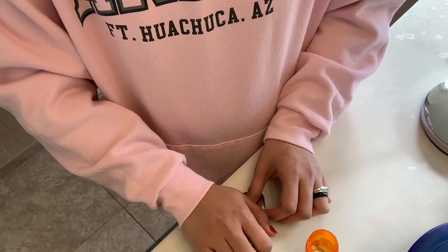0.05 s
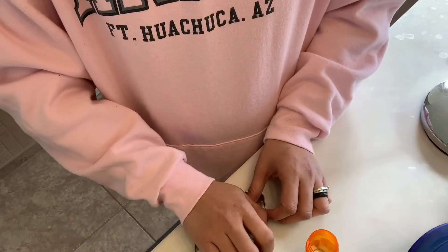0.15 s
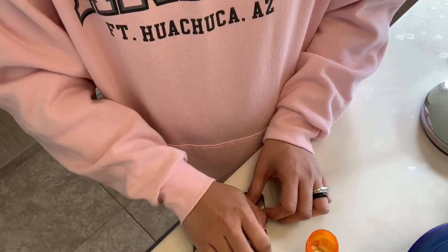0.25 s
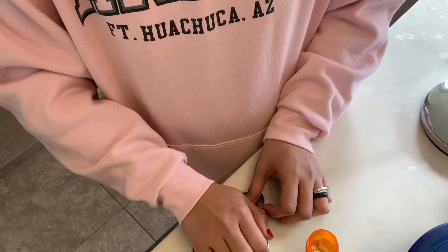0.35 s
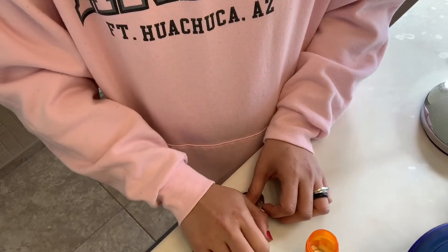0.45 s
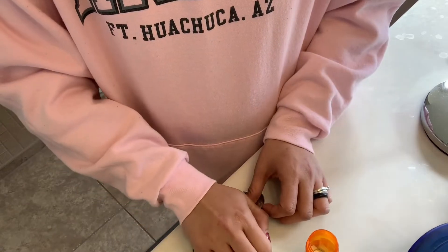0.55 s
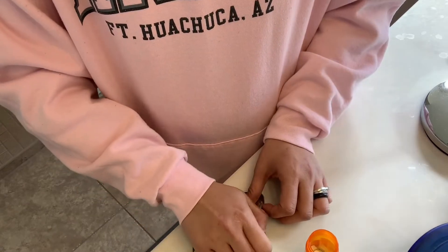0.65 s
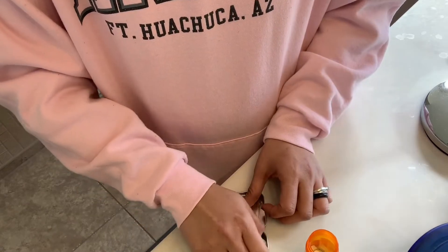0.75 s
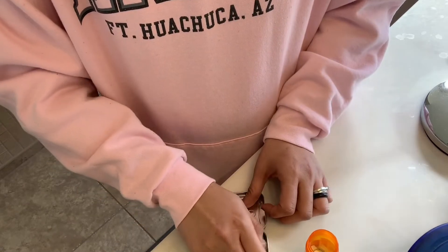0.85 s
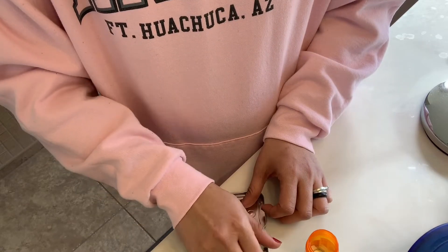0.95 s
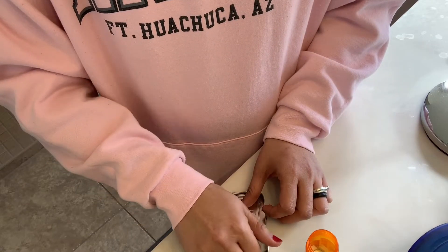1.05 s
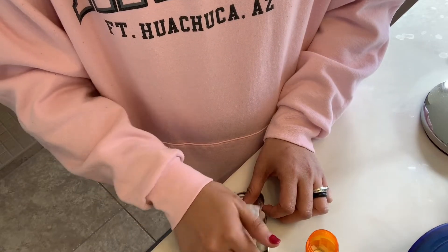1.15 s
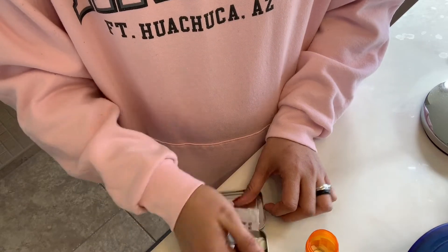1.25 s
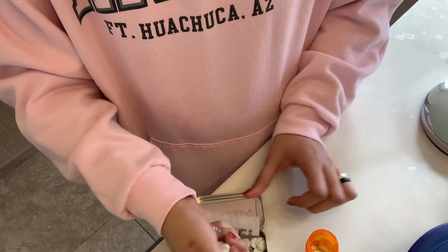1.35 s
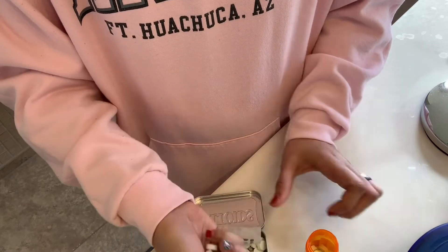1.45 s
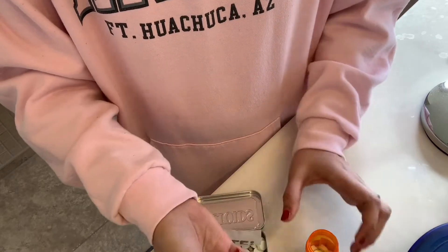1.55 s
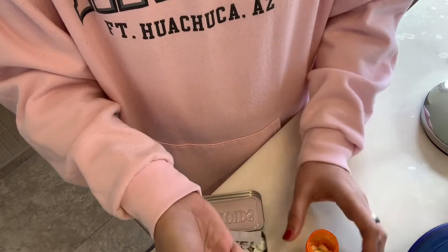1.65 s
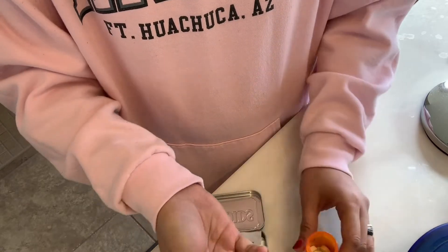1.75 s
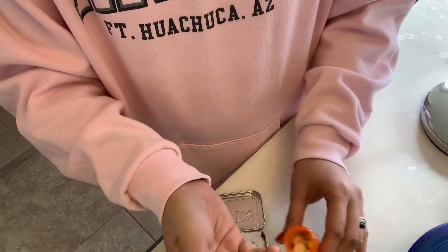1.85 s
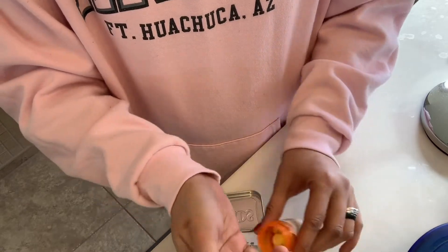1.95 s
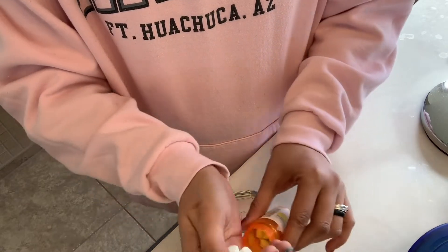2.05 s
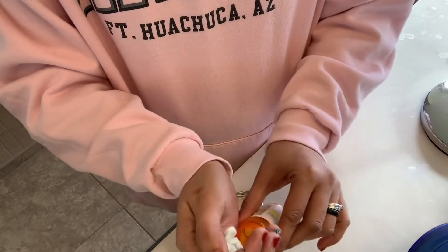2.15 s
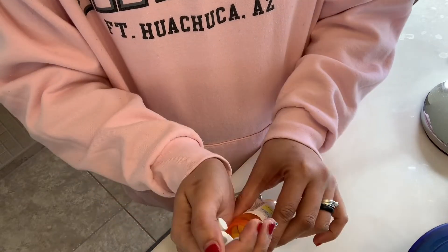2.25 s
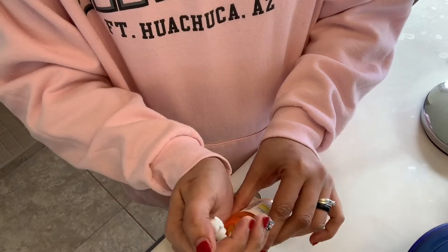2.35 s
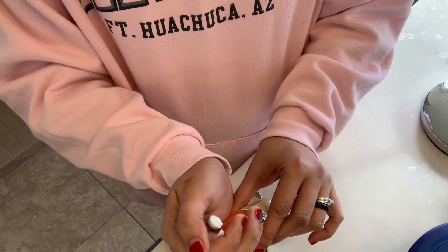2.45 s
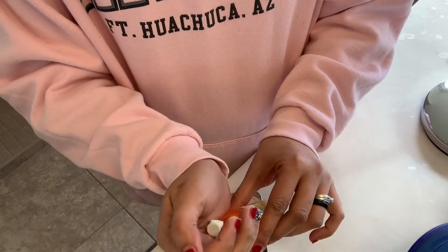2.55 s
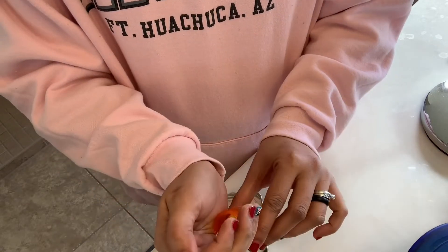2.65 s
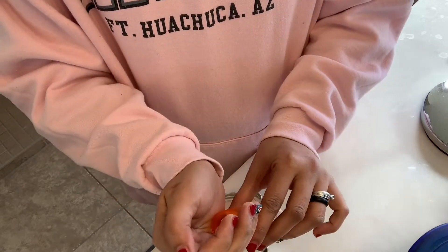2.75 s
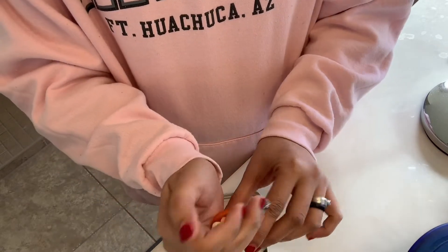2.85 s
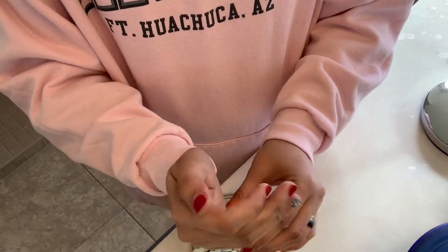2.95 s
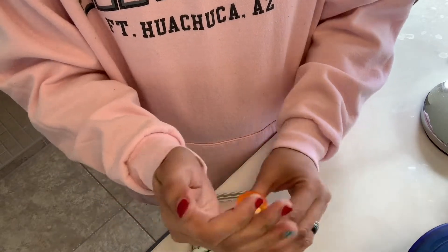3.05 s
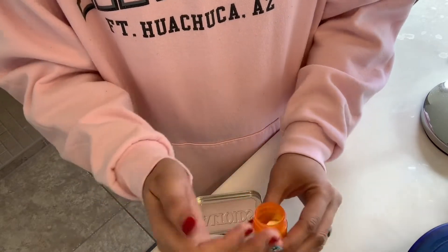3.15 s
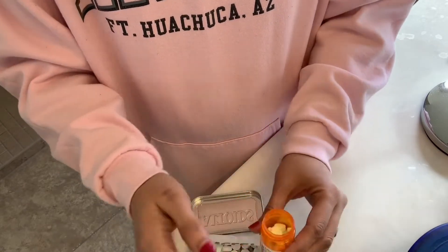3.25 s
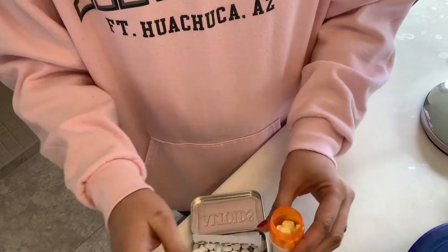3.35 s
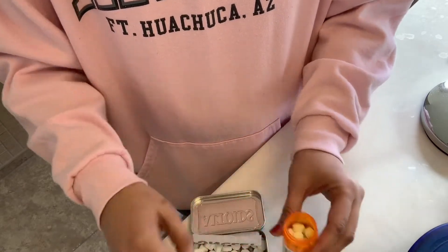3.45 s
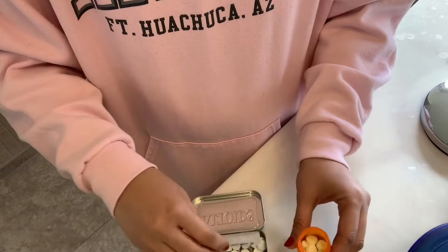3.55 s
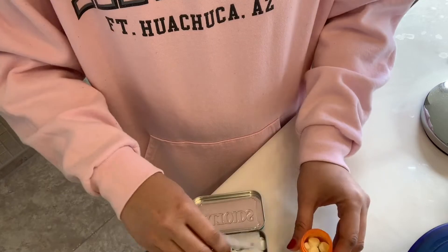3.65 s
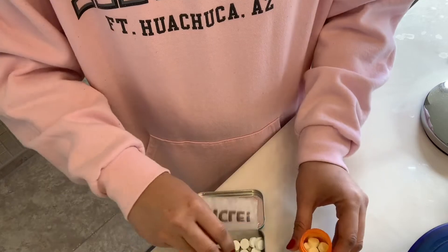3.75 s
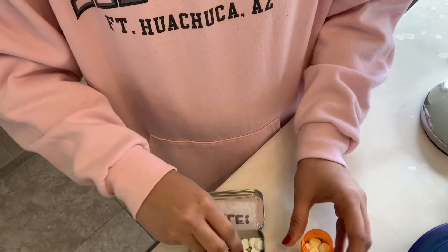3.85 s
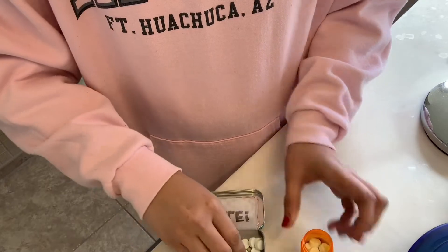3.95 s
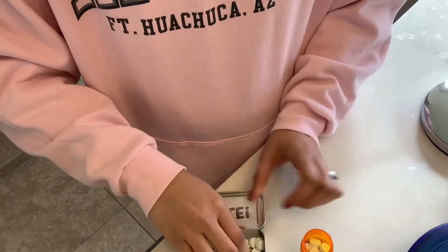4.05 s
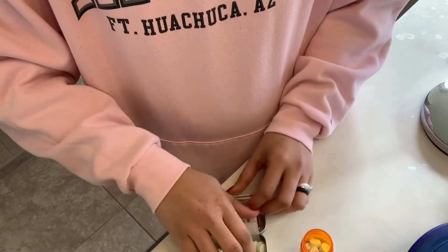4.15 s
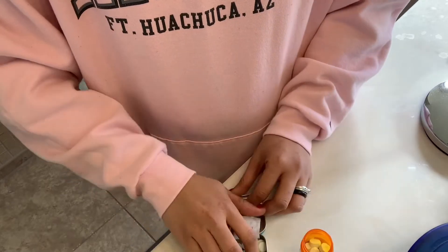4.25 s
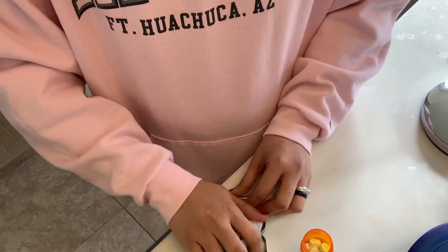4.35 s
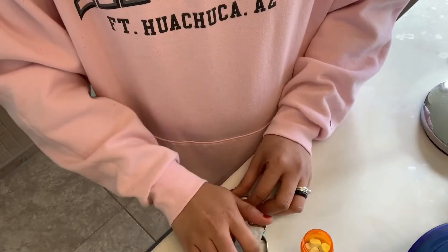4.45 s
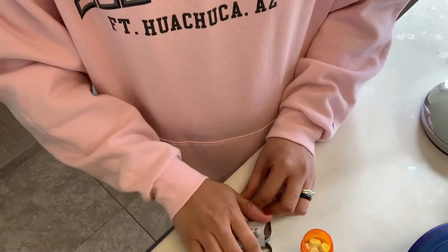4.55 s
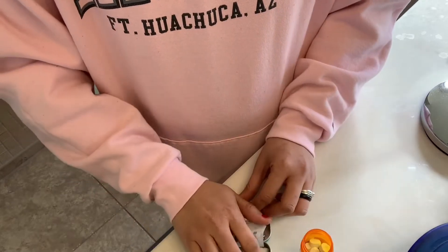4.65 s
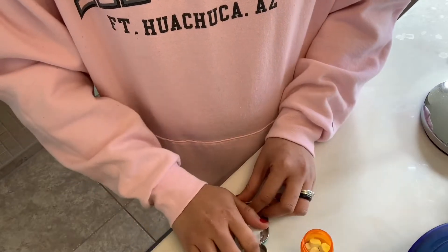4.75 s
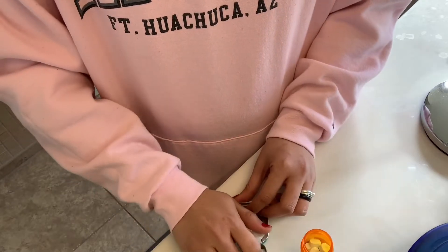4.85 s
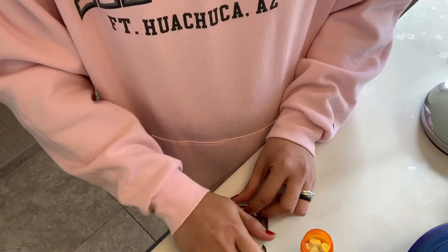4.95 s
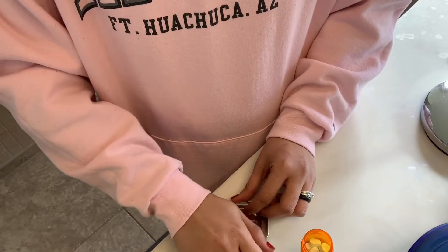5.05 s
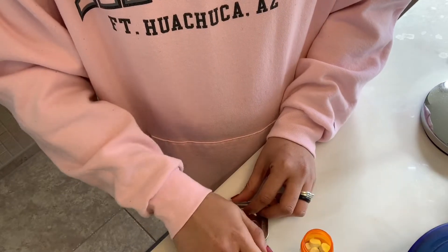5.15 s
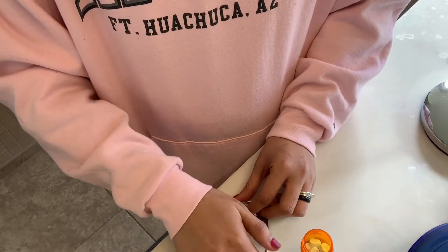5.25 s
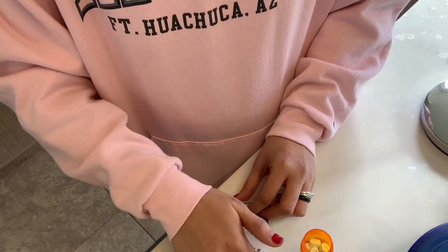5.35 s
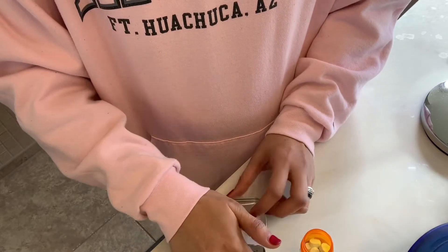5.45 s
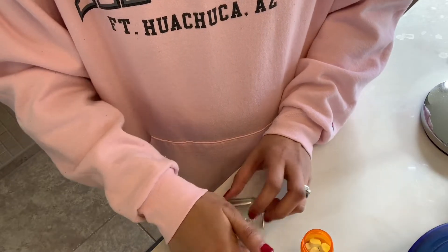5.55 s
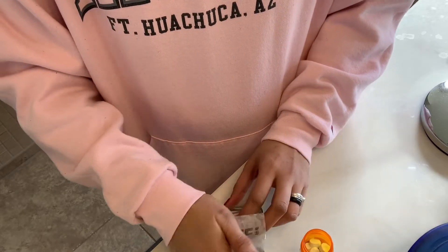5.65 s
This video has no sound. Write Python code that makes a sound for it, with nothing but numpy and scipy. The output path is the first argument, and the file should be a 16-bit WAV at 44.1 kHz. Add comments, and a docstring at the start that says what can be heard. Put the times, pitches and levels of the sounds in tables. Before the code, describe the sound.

Fingers stir little mints in a tin, the lid clacks, mints patter into a plastic bottle, then more stirring and another clack.

```python
"""In a small, hard kitchen with a low appliance hum, fingers stir little mints in a hinged tin.
The mints grind and click against each other and the metal, then the lid clacks open onto the counter.
A handful is tipped from the palm into a plastic pill bottle, and the air inside pops at each drop.
The fingers go back to the tin, and after a brief gritty hiss the lid clacks again."""
import sys
import numpy as np
from scipy import signal
from scipy.fft import rfft, irfft, next_fast_len
from scipy.io import wavfile
from scipy.ndimage import uniform_filter1d, map_coordinates

SR = 44100
rng = np.random.default_rng(int(sys.argv[2]) if len(sys.argv) > 2 else 0)


def put_to_file(sound):
    """Save the sound as 16-bit audio at rate SR, in the file named by the first command-line argument."""
    columns = np.atleast_2d(sound).T  # one column per channel
    safe = np.clip(columns, -1, 1)
    whole_steps = np.round(safe * 32767)
    wavfile.write(sys.argv[1], SR, whole_steps.astype(np.int16))


N = 250929
TOP_HZ = 15900  # upper limit of the treble

# Levels are relative: each sound adds its own gain. t60 is the time to fade by 60 dB.
# the appliance's tones: f/Hz, level/dB
HUM_TONES = [(54.5, -62), (107.3, -60)]
# the room's steady rumble: f/Hz, level/dB
RUMBLE_SPECTRUM = [(8, -9), (18, 8.5), (35, -2.5), (90, -0.5), (112, -3.5), (135, -13.5), (175, -23),
                   (320, -38), (800, -38.5), (2500, -43.5), (8000, -52.5), (15000, -49)]
# swells of crunching as the mints are stirred; the last row is a brief gritty hiss just before
# the second lid clack: t/s, length/s, crunch/dB, floor scrape/dB, counter rumble/dB
CRUNCH_SWELLS = [(-0.02, 0.036, -49, -43, -88), (.105, 0.095, -44.5, -46.5, -69),
                 (.29, 0.092, -40.5, -40, -54), (.495, 0.14, -46, -46, -62), (.64, 0.082, -45.5, -50, -70),
                 (.728, .085, -38.5, -42, -84), (.872, 0.18, -41, -47, -65.5),
                 (1.11, 0.043, -51, -48, -52.5), (1.278, 0.088, -52, -48, -64),
                 (3.56, 0.073, -51.5, -54.5, -60), (3.655, 0.04, -43.5, -50.5, -58),
                 (3.725, 0.086, -45.5, -56, -58), (3.872, 0.017, -41, -49.5, -69),
                 (4.018, 0.19, -42.5, -62, -69.5), (4.287, 0.053, -36.5, -47, -51.5),
                 (4.458, 0.038, -36, -54, -67), (4.53, 0.041, -41.5, -57, -63),
                 (4.645, 0.038, -44, -57, -60.5), (4.692, 0.0496, -38.5, -42.5, -54.5),
                 (4.755, 0.058, -39.5, -43, -55), (4.83, 0.24, -42, -44.5, -62),
                 (5.125, 0.11, -38.5, -42, -82), (5.25, .13, -45.5, -53.5, -67.5),
                 (5.39, 0.09, -47.5, -52, -64), (5.599, 0.015, -28.5, -40.5, -66)]
# resting fingers keep the pile moving a little: t/s, length/s, crunch/dB, scrape/dB, rumble/dB
FINGER_RESTS = [(-0.02, 1.34, -50.5, -56, -74), (3.631, 1.975, -50, -61, -67.5)]
# mints grinding together: f/Hz, level/dB
CRUNCH_SPECTRUM = [(300, -41.5), (1500, -13.5), (2800, -2.5), (3600, -6), (4900, -4.5), (7700, -7),
                   (8400, -2), (10500, -2.5), (12000, -4), (15500, -6)]
# resonances of the tin's floor, damped by the mints on it: f/Hz, width/Hz, level/dB
FLOOR_MODES = [(645, 58, 3), (855, 70, -2.5), (1074, 120, -5.5), (1467, 180, 1), (1920, 200, 1.5),
               (2180, 290, -2.5), (3007, 700, -5)]
# ringing tones of the tin's sheet metal: f/Hz, level/dB, t60/s
METAL_MODES = [(1625, -2, 0.18), (2030, -6, 0.27), (2247, -0.5, 0.15), (2440, -4.5, 0.3), (3777, -2, .2),
               (4340, -6.5, 0.13), (4700, -6.5, .17), (5420, -2.5, 0.19), (6550, -3.5, 0.11),
               (7680, 1.5, .2), (8080, -3.5, 0.36), (8516, -3.5, 0.39), (8800, -2.5, 0.094),
               (9082, -9.5, .24), (9930, -1, 0.27), (9850, 9.5, 0.095), (12900, 0.5, 0.1)]
# the low sound that the counter carries: f/Hz, level/dB
COUNTER_SPECTRUM = [(40, -8.5), (90, 14), (170, -2.5), (300, -4.5), (450, -4.5), (600, -1.5), (1200, -35)]
# the clearest clicks in the tin: t/s, level/dB, floor relative to level/dB, struck spot's f/Hz
TIN_CLICKS = [(0.1043, -28, -7, 1920), (0.1714, -31.5, -6, 1720), (0.1765, -23.5, -5, 1830),
              (0.3038, -29.5, -10, 1600), (0.3213, -29, -8.5, 1420), (0.507, -34, -6, 630),
              (0.545, -37.5, -2, 630), (0.6562, -27.5, -25, 1830), (0.7555, -30.5, -10, 820),
              (0.7825, -27, -16, 880), (0.8495, -39, -3, 1430), (0.8778, -27.5, -9, 887),
              (0.9483, -35, 2.5, 1660), (0.9519, -28, -10.5, 970), (1.123, -44, 3.5, 1580),
              (1.1399, -34, -9, 694), (1.167, -33, -7.5, 676), (1.5812, -38.5, -35.5, 2255),
              (3.478, -64.5, -2, 1700), (3.5123, -50.5, -18, 1900), (3.619, -34.5, -25, 1580),
              (3.6469, -34, -10.5, 1710), (3.684, -35, -9.5, 1410), (3.7247, -23, -12.5, 687),
              (3.7817, -23, -24, 620), (3.7877, -26.5, -27, 563), (3.888, -36, -8, 890),
              (3.9543, -28, -11, 1730), (4.0262, -35, -7, 1820), (4.0538, -33.5, -9, 900),
              (4.1036, -29, -28, 1730), (4.1775, -34, -11, 1580), (4.3085, -23, -23, 1810),
              (4.339, -28.5, -8, 1870), (4.729, -36.5, 2, 1800), (4.814, -33, -0.5, 1450),
              (4.8569, -28.5, -12, 650), (4.8764, -29, -6, 1500), (4.9388, -25.5, -9.5, 1480),
              (4.9454, -25, -19, 1840), (4.9771, -28, -13, 2120), (5.0339, -31.5, -8, 1460),
              (5.0991, -31.5, -3, 1160), (5.145, -41.5, 6.5, 1530), (5.201, -35, -2, 1370),
              (5.213, -36.5, -3, 1500), (5.3968, -31.5, -16, 1710), (5.431, -44.5, 1, 650),
              (5.5405, -38.5, -5.5, 1710), (5.5532, -39, -20, 1740)]
# one mint's click: f/Hz, level/dB
MINT_SPECTRUM = [(400, -35), (1500, -6.5), (3200, -3.5), (4800, 0), (6500, -1.5), (8000, 2.5), (10000, 2),
                 (12000, -2.5), (15500, -1)]
# the lid coming down: t/s, level/dB, thud/dB, rocking relative to the first hit/dB
LID_CLACKS = [(1.342, -14, -46.5, -23), (5.6207, -13.5, -43, -8.5)]
# the lid's sharp crack: f/Hz, level/dB
CRACK_SPECTRUM = [(200, -38.5), (700, -11), (1300, -9), (2250, 6), (2900, -6), (4400, -1.5), (5900, 1),
                  (8500, 1.5), (9900, 2.5), (10800, -0.5), (15500, -4)]
# mints and bottle rubbing on skin: t/s, length/s, level/dB
HAND_SCUFFS = [(1.38, .15, -58.5), (1.733, 0.028, -58), (1.785, 0.03, -67.5), (2.19, 0.053, -61),
               (2.24, 0.1, -57), (2.44, 0.14, -63), (2.635, 0.048, -56.5), (3.028, 0.057, -56),
               (3.165, 0.039, -60.5), (3.28, 0.022, -66)]
# rubbed skin: f/Hz, level/dB
SKIN_SPECTRUM = [(200, -23), (500, -9), (850, -1), (1300, -4), (2200, 0.5), (3300, -3.5), (8000, -8),
                 (11000, -11), (15500, -21)]
# mints landing in the bottle: t/s, level/dB, air relative to level/dB, wall relative to level/dB
BOTTLE_DROPS = [(2.0394, -70, 5.5, -3), (2.1001, -57.5, -19, 2.5), (2.2054, -44, 1, -0.5),
                (2.2504, -45, -11, -2), (2.2613, -32.5, -26, -12), (2.2787, -32, -21, -12),
                (2.2834, -37.5, -25, -15), (2.3246, -38, -20, -12), (2.4049, -35.5, -15, -28),
                (2.4314, -33, -7.5, -5), (2.4977, -32, -39, -10.5), (2.5084, -29.5, -19, -20),
                (2.5152, -27.5, -20, -22), (2.579, -39.5, -35, -15), (2.607, -46.5, -1.5, -1.5),
                (2.6559, -38, -18, -5.5), (2.6648, -38.5, -10.5, -9), (2.6818, -36, -20, -12),
                (2.6958, -30.5, -26, -24), (2.7716, -44, -23, -15), (2.819, -35.5, -21, -17),
                (3.047, -42, -19, -13), (3.0704, -40, -17.5, -9), (3.1542, -45, -9, -0.5),
                (3.1774, -60.5, 10.5, 7.5), (3.2146, -50, -18, -6.5), (3.2904, -52.5, -14, -12)]
# pitch of the air in the bottle, lower as the hand covers its mouth: t/s, f/Hz
AIR_PITCH = [(2.04, 910), (2.21, 785), (2.3, 730), (2.42, 777), (2.68, 784), (3.05, 760), (3.18, 890)]
# resonances of the bottle's plastic wall: f/Hz, width/Hz, level/dB
PLASTIC_MODES = [(1160, 130, -19), (2020, 244, -2), (2470, 280, -3), (4160, 1400, -8)]
# the palm meeting the bottle: t/s, level/dB
PALM_BUMPS = [(2.309, -52.5), (2.327, -56.5)]
# resonances of the cupped palm: f/Hz, width/Hz, level/dB
PALM_MODES = [(129, 67, 2), (238, 70, -5.5)]
# bottle and tin knocking on the counter: t/s, level/dB
COUNTER_KNOCKS = [(3.663, -37), (3.683, -43), (3.724, -47), (4.331, -40.5)]
# resonances of the countertop: f/Hz, width/Hz, level/dB
COUNTER_MODES = [(174, 28, 1.5), (215, 54, -0.5), (429, 28, -6), (634, 100, -7.5)]
# how long the kitchen echoes: f/Hz, t60/s
ROOM_DECAY = [(150, 0.85), (600, 0.48), (2200, 0.46), (5000, 0.38), (9000, 0.24), (15000, 0.16)]
# how alike left and right are: f/Hz, likeness (1 = the same, 0 = unrelated)
STEREO_LIKENESS = [(130, 0.98), (300, 0.94), (700, 0.57), (1400, 0.85), (3000, 0.38), (6000, 0.26),
                   (9000, 0)]
# how much louder the left side is than the right: f/Hz, level/dB
STEREO_BALANCE = [(300, 0.5), (650, -3), (1150, 0), (1600, -3), (2600, -0.5), (7700, 0), (8100, 13),
                  (9100, -0.5), (10000, -1)]


def amp(db):
    """Turn decibels into a gain to multiply by."""
    return 10 ** (np.asarray(db) / 20)


def unit(x):
    """Scale each channel to an average (rms) strength of 1."""
    return x / np.sqrt(np.mean(x ** 2, axis=-1, keepdims=True) + 1e-20)


def along(points, hz):
    """Read between (f/Hz, value) points on a logarithmic frequency scale."""
    f, values = np.transpose(points)
    return np.interp(np.log(hz + 1), np.log(f + 1), values)


def wobble(rate):
    """A smooth random curve through rate points a second."""
    points = rng.standard_normal(int(N * rate / SR) + 4)
    return map_coordinates(points, [np.arange(N) * rate / SR])


def add(track, s, sound):
    """Mix a sound into the track at s seconds."""
    slot = track[:, max(round(s * SR), 0):][:, :sound.shape[1]]
    slot += sound[:, :slot.shape[1]]


def filtered(x, response):
    """Filter x; response gives the gain and phase at each frequency."""
    n = x.shape[-1]
    padded = 2 * next_fast_len(n * 2 // 3)
    return irfft(rfft(x, padded) * response(np.fft.rfftfreq(padded, 1 / SR)), padded)[..., :n]


def colour(spectrum):
    """A filter with this spectrum that rings only after a hit, never before."""
    def response(hz):
        cepstrum = irfft(np.log(amp(along(spectrum, hz))))
        half = len(cepstrum) // 2
        return np.exp(rfft(np.r_[cepstrum[0], 2 * cepstrum[1:half], np.zeros(half)]))
    return response


def body(modes):
    """A filter that rings like an object at its modes (resonances); wider ones die sooner."""
    return lambda hz: sum((-1) ** k * amp(db) * 1j * hz * width / (pitch**2 - hz**2 + 1j * hz * width)
                          for k, (pitch, width, db) in enumerate(modes))


def spread(pair):
    """Mix two unrelated signals into left and right: alike in the bass, apart in the treble."""
    def weights(hz):
        angle = np.arccos(np.clip(along(STEREO_LIKENESS, hz), -1, 1)) / 2
        return np.array([np.cos(angle), np.sin(angle)])
    mid, side = filtered(pair, weights)
    return np.array([mid + side, mid - side])


def burst(response, t60, chatter_s=0):
    """One hit and three lighter touches within chatter_s: fading noise sent through a filter."""
    t = np.arange(4096) / SR
    noise = rng.standard_normal((2, len(t)))
    starts = np.r_[0, chatter_s * rng.random(3)]
    sizes = np.r_[1, amp(rng.normal(-7, 3, 3))]
    age = t - starts[:, None]
    touches = sizes[:, None] * (age >= 0) * amp(-60 * np.abs(age) / t60)
    hit = filtered(noise * np.linalg.norm(touches, axis=0), response)
    return unit(hit) * np.sqrt(.002 * SR / len(t))  # as much energy as 2 ms at strength 1


def background():
    """The room rumbles softly under an appliance's wavering hum."""
    t = np.arange(N) / SR
    hum = sum(amp(db + 3.8 * wobble(1.8)) * np.sin(2 * np.pi * hz * t + 0.3 * wobble(5))
              for hz, db in HUM_TONES)
    rumble = filtered(rng.standard_normal((2, N)), colour(RUMBLE_SPECTRUM))
    return hum + amp(-57) * unit(spread(rumble))


def swells(rows, lag_s=0, attack_s=0.019, release_db_per_s=383):
    """Each row builds up, holds and dies away; gives one gain curve for each dB column."""
    rows = np.array(rows)
    age = np.arange(N) / SR - (rows[:, :1] + lag_s)
    lengths, gains = rows[:, 1:2], amp(rows[:, 2:])
    shapes = np.clip(age / attack_s, 0, 1) * amp(-release_db_per_s * np.maximum(age - lengths, 0))
    return np.sqrt(gains.T ** 2 @ shapes ** 2)  # overlapping swells add in power


def pings(rate, pitch_hz, octaves, cycles, scatter_db):
    """Random taps, rate a second: each is a fading tone at the pitch of the spot it strikes."""
    count = int(rate * N / SR)
    when, *phases = np.hsplit(rng.random((count, 3)), 3)
    detune, size = np.hsplit(np.clip(rng.standard_normal((count, 2)), -2, 2), 2)
    hz = np.minimum(pitch_hz * 2 ** (octaves * detune), TOP_HZ)
    samples = np.arange(1024)
    turns = hz * samples / SR
    fade = amp(scatter_db * size - 60 * turns / cycles)
    positions = ((when * N).astype(int) + samples).ravel()
    tones = [fade * np.sin(2 * np.pi * (turns + phase)) for phase in phases]
    return unit(np.array([np.bincount(positions, tone.ravel(), N)[:N] for tone in tones]))


def grains(rate, scatter_db, t60):
    """Tiny noisy contacts of uneven size, rate a second; each grips before it slips."""
    hits = rng.random(N) < rate / SR
    size = np.clip(rng.standard_normal(N), -2, 2)
    power = signal.lfilter([1], [1, -amp(-120 / (t60 * SR))], hits * amp(2 * scatter_db * size))
    power = np.abs(uniform_filter1d(power, size=60))  # soften each start
    return unit(np.sqrt(power) * rng.standard_normal((2, N)))


def tin_ring():
    """The metal rings a little differently each time; loose mints buzz on it and blur its tones."""
    t = np.arange(SR // 3) / SR
    ring = np.zeros((2, len(t)))
    for hz, db, t60 in METAL_MODES:
        fade = amp(db + 2 * rng.standard_normal((2, 1)) - 60 * t / t60)
        drift = rng.random((2, 1)) + .0075 * np.cumsum(rng.standard_normal(ring.shape), axis=1)
        ring += fade * np.sin(2 * np.pi * (hz * t + drift))
    return unit(ring) / np.sqrt(len(t))


def stirring():
    """Mints grind on each other and the tin's floor; its walls ring and the counter carries the bass."""
    rows = [*CRUNCH_SWELLS, *FINGER_RESTS]
    crunch_gain, scrape_gain, _ = swells(rows)
    rumble_gain = swells(rows, lag_s=0.0191)[-1]  # the tin shifts just after the fingers dig in
    taps = pings(rate=260, pitch_hz=1500, octaves=.55, cycles=42, scatter_db=2.5)
    ticks = pings(rate=600, pitch_hz=6200, octaves=.55, cycles=80, scatter_db=2)
    floor = unit(filtered(grains(rate=420, scatter_db=1, t60=0.016), body(FLOOR_MODES)))
    grit = grains(rate=600, scatter_db=2.5, t60=.009)
    grinding = unit(filtered(grit + .8 * ticks, colour(CRUNCH_SPECTRUM)))
    wall_hits = grains(rate=500, scatter_db=2, t60=.004)
    walls = unit(signal.fftconvolve(wall_hits, tin_ring(), axes=1)[:, :N])
    rumble = unit(filtered(grains(rate=190, scatter_db=3, t60=0.072), colour(COUNTER_SPECTRUM)))
    scrape = scrape_gain * amp(-5.5) * (floor + amp(-0.5) * taps)
    crunch = crunch_gain * (amp(-3.5) * grinding + amp(-11.5) * walls)
    slips = amp(1.2 * wobble(55))  # the pile jams and gives way
    return slips * (scrape + crunch + rumble_gain * amp(3) * rumble)


def mint_click(t60, chatter_s, ring_hz):
    """A hard mint gives a crack and three very short resonances that vary from mint to mint."""
    modes = [(ring_hz * np.exp(.35 * detune), 1100, 1) for detune in rng.standard_normal(size=3)]
    return burst(lambda hz: colour(MINT_SPECTRUM)(hz) * (1 + body(modes)(hz)), t60, chatter_s)


def stray_clicks(per_second=34):
    """Lesser clicks at random times, following the strength of the crunch: rows like TIN_CLICKS."""
    when, softness, touch, spot = rng.random((int(per_second * N / SR), 4)).T
    crunch = swells([*CRUNCH_SWELLS, *FINGER_RESTS])[0][(when * N).astype(int)]
    db = 20 * np.log10(crunch + 1e-9) + 9 - 10 * softness
    return zip(when * N / SR, db, -20 * touch, 650 * 3 ** spot)


def tin_clicks():
    """Single mints snap past each other and tap the tin's floor, each spot at its own pitch."""
    out = np.zeros((2, N))
    for s, db, floor_db, spot_hz in [*TIN_CLICKS, *stray_clicks()]:
        ring_hz = 6000 * amp(-.18 * floor_db)  # a lighter touch clicks higher
        spot = body([(spot_hz, 58, 12.5)])  # stands out from the floor's other resonances
        floor = lambda hz: body(FLOOR_MODES)(hz) + 1j * spot(hz)
        add(out, s, amp(db - 1.5) * mint_click(t60=.009, chatter_s=.005, ring_hz=ring_hz))
        add(out, s, amp(db + floor_db + 3.5) * burst(floor, t60=.006, chatter_s=.004))
    return out


def lid_clacks():
    """The lid strikes the counter with a crack, a brief metal ring and a dull thud."""
    out = np.zeros((2, N))
    for s, db, thud_db, rocking_db in LID_CLACKS:
        edges = [(0, 0), (.003, -4)]  # two edges land in turn: delay/s, level/dB
        rocking = [(0.01 * k, rocking_db) for k in range(1, 5)]  # then the tin rocks four times
        for delay, touch_db in edges + rocking:
            crack = amp(db - 2) * burst(colour(CRACK_SPECTRUM), t60=0.012, chatter_s=0.00085)
            ring = amp(db + 12.5) * tin_ring()
            thud = amp(thud_db + 8.5) * burst(colour(COUNTER_SPECTRUM), t60=0.13)
            for part in (crack, ring, thud):
                add(out, s + delay, amp(touch_db) * part)
    return out


def hand_scuffs():
    """Mints and bottle rub softly against the skin."""
    friction = grains(rate=970, scatter_db=1.5, t60=0.035)
    return swells(HAND_SCUFFS)[0] * unit(filtered(friction, colour(SKIN_SPECTRUM)))


def bottle_drops():
    """Each falling mint clicks, knocks the plastic wall and makes the air in the bottle pop."""
    out = np.zeros((2, N))
    for s, db, air_db, wall_db in BOTTLE_DROPS:
        air_hz = np.interp(s, *np.transpose(AIR_PITCH))
        add(out, s, amp(db - 4) * mint_click(t60=0.0089, chatter_s=0.0017, ring_hz=8000))
        add(out, s, amp(db + wall_db + 1) * burst(body(PLASTIC_MODES), t60=0.049))
        add(out, s, amp(db + air_db + 3.5) * burst(body([(air_hz, 46, 0)]), t60=0.0032))
    return out


def palm_bumps():
    """The cupped palm meets the bottle with a dull thump."""
    out = np.zeros((2, N))
    for s, db in PALM_BUMPS:
        add(out, s, amp(db + 1) * burst(body(PALM_MODES), t60=0.031))
    return out


def counter_knocks():
    """Bottle or tin bumps the countertop, which answers with a low, hollow knock."""
    out = np.zeros((2, N))
    for s, db in COUNTER_KNOCKS:
        add(out, s, amp(db - 0.5) * burst(body(COUNTER_MODES), t60=0.0091))
    return out


def kitchen_echo(x):
    """The hard room throws the sound back; the treble dies away sooner than the bass."""
    hz, t, noise = signal.stft(rng.standard_normal((2, SR // 2)), SR, nperseg=256)
    fade = amp(-60 * t / along(ROOM_DECAY, hz)[:, None])
    tail = signal.istft(noise * fade, SR, nperseg=256)[1]
    tail = np.pad(tail / np.linalg.norm(tail[0]), ((0, 0), (round(.004 * SR), 0)))  # starts 4 ms late
    echo = signal.fftconvolve(x, tail, axes=1)[:, :N]
    return filtered(echo, colour([(300, -4), (2000, -1.5), (9000, -1.5), (12000, -7.5), (15500, -8.5)]))


def scene():
    """Tin, bottle and hands, with the kitchen's echo and hum."""
    near = stirring() + tin_clicks() + lid_clacks()
    near = near + bottle_drops() + counter_knocks() + palm_bumps() + hand_scuffs()
    return spread(near + amp(-4) * kitchen_echo(near)) + background()


def record(dry):
    """A phone's two microphones differ in tone and share the top treble, delayed and flipped."""
    delay = lambda hz, s: np.exp(-2j * np.pi * hz * s)
    shared = lambda hz: np.clip((hz - 9600) / 1200, 0, 1)
    left, right = filtered(dry, lambda hz: amp(np.outer([.5, -.5], along(STEREO_BALANCE, hz))))
    left = filtered(left, lambda hz: delay(hz, 0.00011))  # sound reaches the right side first
    right = filtered(right, lambda hz: np.sqrt(1 - shared(hz)))
    right += filtered(left, lambda hz: -np.sqrt(shared(hz)) * delay(hz, .000443))
    return filtered(np.array([left, right]), lambda hz: np.clip((TOP_HZ - hz) / 200, 0, 1))


dry = scene()
out = record(dry)
put_to_file(out)
```